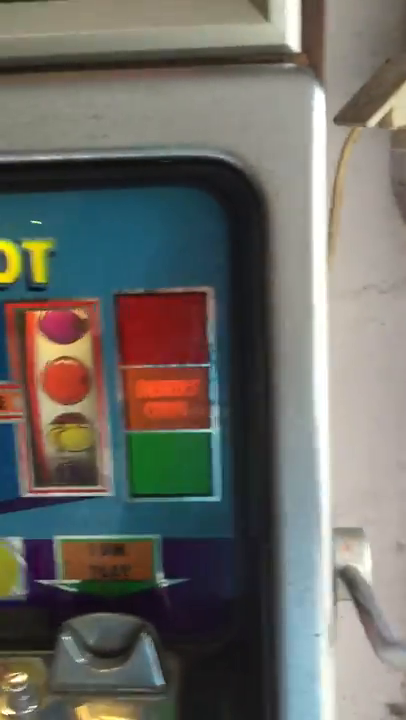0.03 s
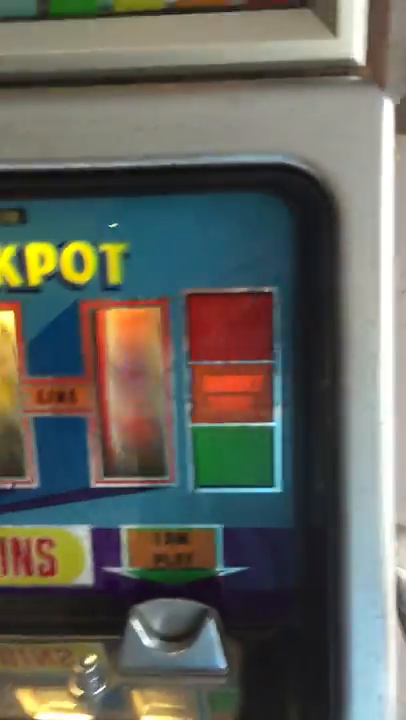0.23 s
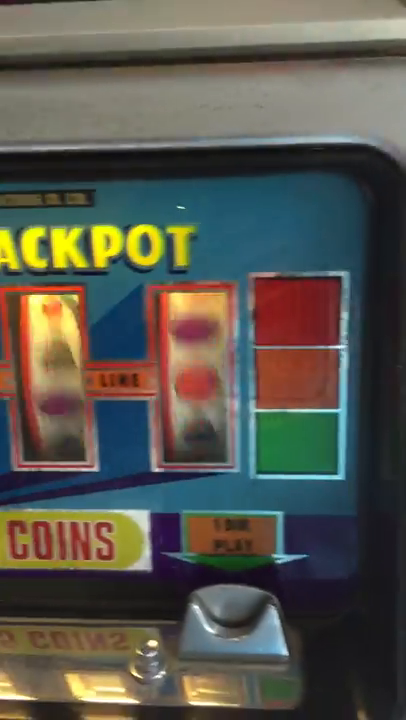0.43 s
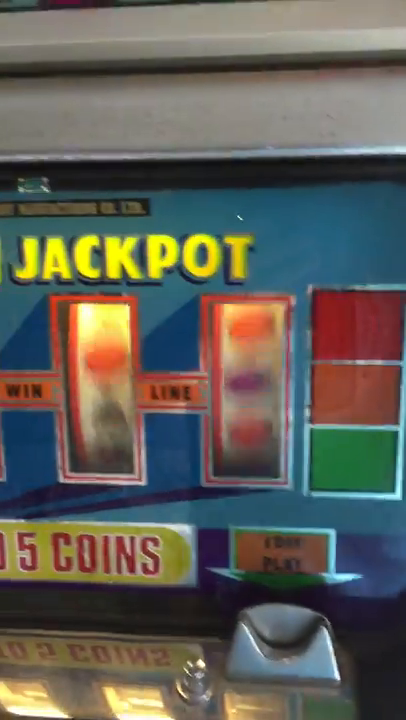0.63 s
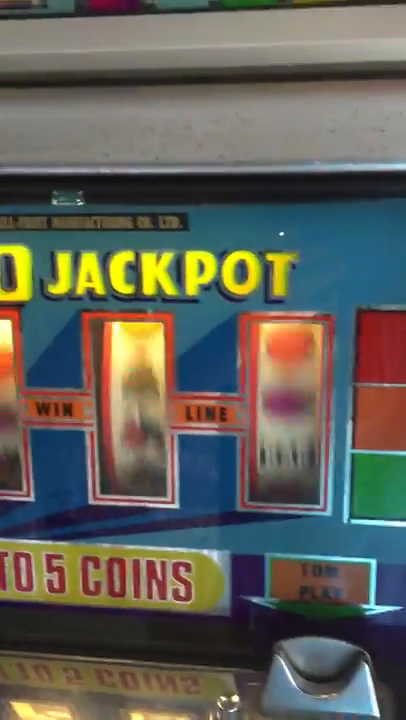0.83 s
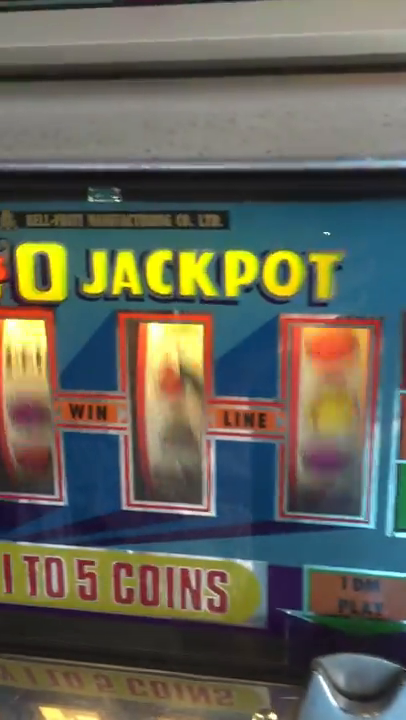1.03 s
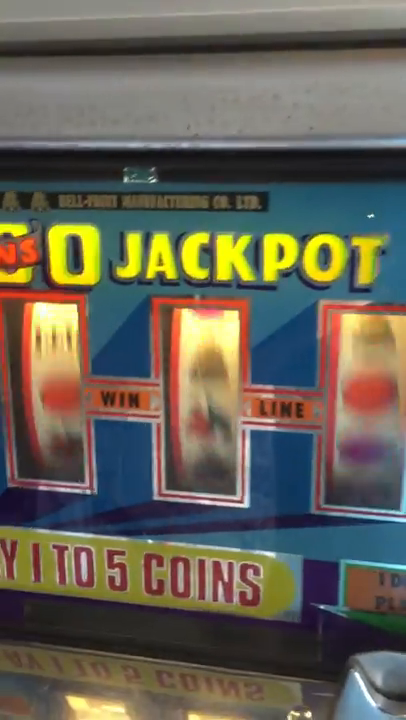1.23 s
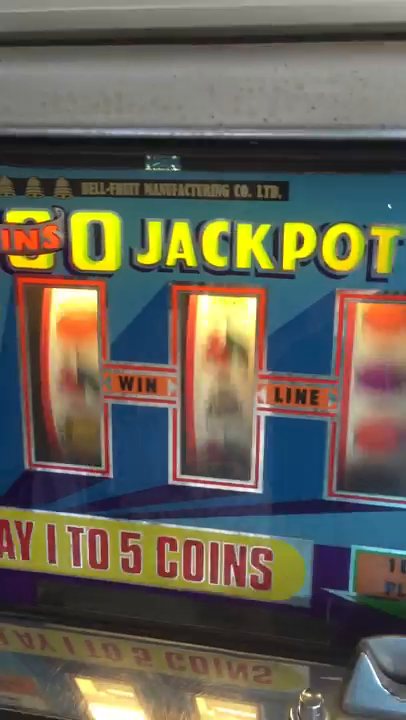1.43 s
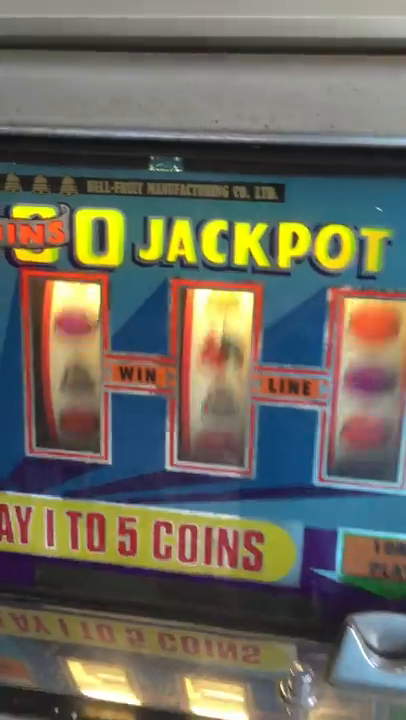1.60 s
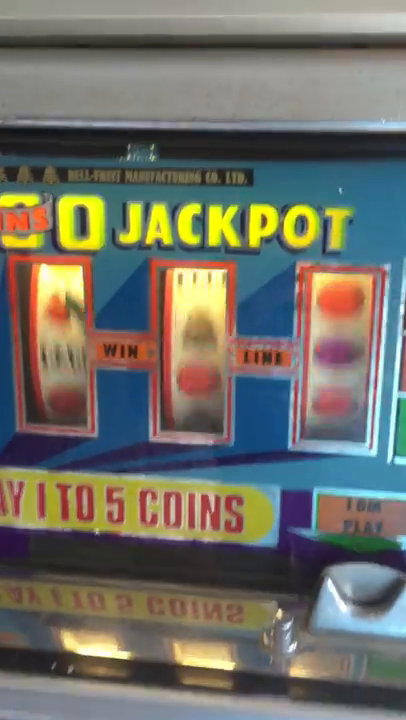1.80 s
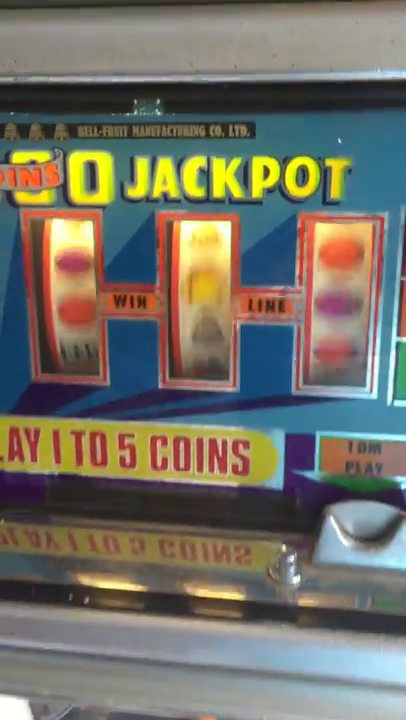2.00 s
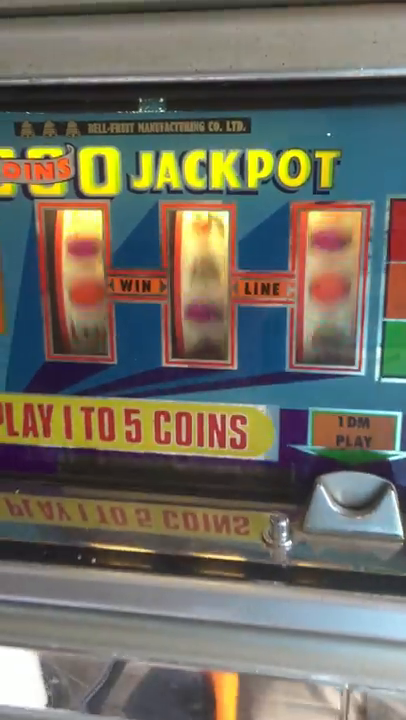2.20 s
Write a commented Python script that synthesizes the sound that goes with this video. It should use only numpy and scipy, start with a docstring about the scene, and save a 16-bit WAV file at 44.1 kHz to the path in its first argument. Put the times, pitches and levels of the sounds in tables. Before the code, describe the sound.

Heavy slot machine clunks and quick ratchet clicks, followed by softly whirring reels.

```python
"""Three heavy clunks of a mechanical slot machine, heard close, release the reels and shake the cabinet.
The lever ticks as it is drawn down ahead of them; afterwards a pawl clatters over a ratchet, slows
and stops. Each metal hit is a fast crack of coloured noise with a tail that rings in the case.
Underneath, the reels spin with a low rumble and faint scrapes while a small motor whirrs inside."""
import sys
import numpy as np
from scipy import signal
from scipy.fft import rfft, irfft
from scipy.io import wavfile

SR = 44100
rng = np.random.default_rng(int(sys.argv[2]) if len(sys.argv) > 2 else 0)


def bounce(signal):
    """Save signal as a 16-bit WAV file at the path given by the first command-line argument."""
    frames = np.transpose(np.atleast_2d(signal))
    limited = np.clip(frames, -1, 1)
    pcm = np.round(limited * 32767).astype(np.int16)
    wavfile.write(sys.argv[1], SR, pcm)


N = 103635
T = np.arange(N) / SR

# low modes of the cabinet (frequency [Hz], level [dB], t60 [s])
CABINET_MODES = [(94.7, -3.5, .35), (109.8, 1, .36), (136, -3.5, .25), (172, -2, 0.23), (195, -11, .25),
                 (223.2, -6, .28), (277, -9.5, .22), (323.2, -4, .28), (404, -9.5, 0.24)]
# tone of light metal contact (frequency [Hz], level [dB])
CONTACT_EQ = [(240, 11), (400, -2.5), (1630, -3), (2120, -3), (2400, -1), (2930, -2), (3260, -5.5),
              (3580, -6), (5350, -10.5), (5780, -7), (7060, -17.5), (9610, -19.5), (16000, -36)]


def release_clunks():
    """Spring-driven parts slam home, ringing the steel frame and thumping the cabinet."""
    # blows (time [s], level [dB], rattle [s], crack t60 [s], tail [dB], frame share [ratio], thump [dB])
    blows = [(0.2261, -14, 0.0079, 0.13, 4.5, 0.22, -12), (.298, -5.5, 0.0034, 0.04, -4, 0.34, -13),
             (0.3772, -4, 0.012, 0.052, 1.5, 0.89, -14)]
    # one tone curve for each blow (frequency [Hz], level [dB])
    blow_eqs = [
        [(150, -9), (250, 7.5), (369, -11), (615, -17.5), (1010, -12.5), (1140, -14), (2190, -10.5), (3070, -4),
         (4770, -8), (10600, -25), (14800, -22), (17000, -36)],
        [(150, -38), (250, -2.5), (637, -23), (1100, -1.5), (2350, -14), (2620, -13.5), (3350, -18.5),
         (4520, -14), (4940, -17), (7280, -23), (8240, -22), (11300, -26.5), (17000, -37)],
        [(150, 2.5), (400, -6.5), (700, -13.5), (1100, -3.5), (2000, -7), (3500, -4.5), (5000, -12), (6300, -8),
         (8000, -16), (13000, -16.5), (17000, -26)],
    ]
    # frame resonances at full share (frequency [Hz], width [Hz], boost [dB])
    frame = [(637, 110, 11), (852, 160, 8), (1036, 70, 10), (1466, 40, 7), (1708, 160, 6), (1939, 160, 13),
             (2112, 80, 12), (2266, 90, 13), (2772, 160, 8), (3108, 100, 7), (3442, 60, 9), (3605, 120, 14),
             (4469, 90, 14), (7408, 50, 10), (12067, 120, 11)]
    # tone of the tail (frequency [Hz], level [dB])
    tail_eq = [(200, -7.5), (600, -3.5), (1300, -9.5), (2500, -8), (5000, -8.5), (10000, -1.5),
               (16000, -12)]
    frame_in_tail = .45
    out = np.zeros(N)
    for (s, db, rattle, t60, wet_db, share, thump_db), eq in zip(blows, blow_eqs):
        crack_peaks = [(f, width, share * boost) for f, width, boost in frame]
        tail_peaks = [(f, width, frame_in_tail * boost) for f, width, boost in crack_peaks]
        metal = colour(rng.standard_normal(SR // 2), eq, peaks=crack_peaks)
        case = colour(rng.standard_normal(SR // 2), eq, peaks=tail_peaks)
        add(out, s, amp(db) * strike(metal, rattle, t60, tail_eq, bloom=0.65, wet_db=wet_db, case=case))
        add(out, s, amp(thump_db) * ring(CABINET_MODES, rise=0.016))
    return out


def ratchet():
    """The same pawl drops off each tooth, never in quite the same way."""
    # pawl hits (time [s], level [dB], clack boost [dB], ring boost [dB], sizzle boost [dB])
    teeth = [(.7175, -10, -0.83, -5, 3), (.756, -8.5, -0.97, -2.5, 0), (0.793, -10.5, 0.65, 3.5, 1.5),
             (.828, -11.5, 1, -2, 4), (0.8631, -11, 0.59, 1, 1.5), (0.9007, -11, 1, -3, -2.5),
             (.940, -12.5, 1, 0.5, 2.5), (0.986, -12, -1.5, 2.5, 2), (1.0393, -11.5, -1.4, -0.5, 0.5),
             (1.097, -12.5, -0.27, 0, -0.5), (1.1631, -17.5, 0.37, -7.5, -12)]
    # anchors of each hit's tone: flat, clack, flat, ring, sizzle (frequency [Hz])
    bands_hz = [600, 1800, 3200, 5500, 11000]
    # tone of the pawl (frequency [Hz], level [dB])
    pawl_eq = [(200, -4), (500, 0.5), (900, -2.5), (1500, -3), (2500, 0), (4000, -4.5), (6000, -5),
               (8000, -3), (11000, -3.5), (14000, -6.5), (17500, -15)]
    # resonances of pawl and wheel (frequency [Hz], width [Hz], boost [dB])
    resonances = [(1319, 380, 11), (2010, 350, 14), (2500, 250, 3), (2999, 200, 9), (3449, 400, 6),
                  (4496, 220, 12), (4758, 130, 10), (5187, 170, 13), (5655, 280, 14), (6156, 250, 11),
                  (6711, 230, 9), (9057, 120, 7), (9700, 180, 5), (11164, 90, 8), (11649, 340, 8),
                  (14103, 150, 6), (15480, 400, 8)]
    # ring of the case (frequency [Hz], level [dB])
    case_eq = [(150, -16), (250, -3), (389, -3), (649, -5.5), (940, -0.5), (1620, -1.5), (1940, 0.5),
               (2480, 1), (3120, -5), (3410, -0.5), (4000, -5.5), (5210, -7), (7680, -8), (11500, -9),
               (12800, -11.5), (15600, -17), (17000, -25)]
    # tone of the tail (frequency [Hz], level [dB])
    tail_eq = [(200, -7), (600, -9), (1300, -8.5), (2500, -10), (5000, -8.5), (10000, -8), (16000, -9.5)]
    likeness, vary_db, thump_db = .25, 1.8, -40
    out = np.zeros(N)
    common = rng.standard_normal(SR // 2)
    hz = np.fft.rfftfreq(len(common), 1 / SR)
    for s, db, clack_db, ring_db, sizzle_db in teeth:
        blow = np.sqrt(likeness) * common + np.sqrt(1 - likeness) * rng.standard_normal(len(common))
        boost_db = curve_at(list(zip(bands_hz, [0, clack_db, 0, ring_db, sizzle_db])), hz)
        peaks = [(f, width, boost + vary_db * rng.standard_normal()) for f, width, boost in resonances]
        metal = colour(irfft(rfft(blow) * amp(boost_db)), pawl_eq, peaks=peaks)
        case = colour(rng.standard_normal(len(common)), case_eq)
        add(out, s, amp(db) * strike(metal, hold=0.0043, t60=0.05, tail_eq=tail_eq, case=case))
        add(out, s, amp(thump_db) * ring(CABINET_MODES[-4:], rise=0.01))  # upper modes only
    return out


def lever():
    """The lever's linkage slides and gives light, pinging ticks."""
    # ticks (time [s], level [dB], brightness [dB/octave], ping boost [dB])
    ticks = [(.005, -34.5, 5.5, 8), (0.0381, -26.5, 1.5, 15), (0.055, -35.5, 7, -4), (0.0957, -27, 2, 4),
             (0.112, -34.5, 4, -2), (0.161, -29.5, 1.5, 19), (0.178, -35, 3.5, 3), (0.1953, -28.5, 5.5, -6),
             (0.201, -24, 5, 0), (0.211, -25.5, -2.5, -1), (.3165, -24.5, 2, -2),
             (0.5906, -33.5, 4.5, 10.5), (.683, -34.5, 1, 11), (0.708, -29.5, 5.5, -3), (1.829, -45, 6, -9),
             (1.841, -40, 7, 0)]
    # envelope of the slide (time [s], level [dB])
    slide_levels = [(0, -36.5), (.1, -51.5), (.19, -44), (.26, -24), (.36, -25.5), (.45, -42), (.6, -64),
                    (.7, -58)]
    # tone of a tick's tail (frequency [Hz], level [dB])
    tail_eq = [(200, 2), (1300, -7.5), (5000, -9.5), (16000, -20)]
    ping_hz, ping_width_hz = 2100, 180
    slide = colour(rng.standard_normal(N), CONTACT_EQ, tilt_db=-4.0)
    out = slide * amp(np.interp(T, *np.transpose(slide_levels), right=-90))
    for s, db, tilt, ping_db in ticks:
        metal = colour(rng.standard_normal(SR // 2), CONTACT_EQ, tilt, [(ping_hz, ping_width_hz, ping_db)])
        add(out, s, amp(db) * strike(metal, hold=0.00067, t60=0.067, tail_eq=tail_eq, bloom=0.55))
    return out


def reels():
    """The turning works rumble through the cabinet, with a wavering hum."""
    # tone of the rumble (frequency [Hz], level [dB])
    rumble_eq = [(21, -60), (35, -31), (55, -11.5), (129, -4), (173, -17), (197, -17), (222, -24.5),
                 (303, -17), (336, -24.5), (368, -19), (509, -37.5), (684, -34.5), (1200, -38), (1560, -68),
                 (2640, -120)]
    # hum partials (frequency [Hz], relative level [dB])
    partials = [(73, -6), (99.5, -11.5), (124, -2.5), (148, -7), (197, -14), (313, -19), (376, -20.5),
                (447, -26)]
    # envelope of rumble and hum (time [s], level [dB])
    levels = [(0, -35), (.18, -36.5), (.5, -37.5), (.7, -35.5), (.83, -45), (1, -40), (1.09, -47.5),
              (1.24, -34), (1.37, -41.5), (1.54, -44), (1.65, -40), (1.78, -44), (1.89, -37), (2.15, -42.5),
              (2.33, -40.5)]
    rumble = colour(rng.standard_normal(N), rumble_eq)
    hum = sum(amp(db + 1.3 * drift(2.1)) * np.sin(2 * np.pi * f * T + 0.62 * drift(6.9))
              for f, db in partials)
    return amp(np.interp(T, *np.transpose(levels))) * (amp(-4) * rumble + amp(-1) * hum)


def motor():
    """A fine whirr that swells once in each turn of the shaft, with loose gears chattering in it."""
    # tone of the whirr (frequency [Hz], level [dB])
    whirr_eq = [(350, -57), (600, -11), (720, -10.5), (952, -9.5), (1040, -17), (1240, -13), (1410, -16),
                (1860, -12), (2140, -15), (2500, -9.5), (3550, -19.5), (5710, -7), (6660, -12),
                (9060, -5.5), (10700, -18), (13400, -8.5), (17000, -28)]
    # envelope of the whirr before its swell (time [s], level [dB])
    levels = [(0, -60), (1.3, -54), (1.45, -54), (1.65, -55.5), (1.9, -54), (2.35, -55)]
    # resonances of motor and gears (frequency [Hz], width [Hz], boost [dB])
    gears = [(700, 30, 7), (850, 40, 8), (970, 70, 6), (1680, 60, 4), (2740, 280, 6), (3230, 50, 7),
             (5680, 400, 3), (9460, 60, 4)]
    # pings of loose gear teeth (frequency [Hz], relative level [dB], t60 [s])
    tooth_modes = [(2620, -6, .04), (2740, -3, .04), (2860, -6, .04), (5350, -6, .02), (5650, -2, .02),
                   (5950, -5, .015), (8500, -3, .008)]
    # thin tones of the motor (frequency [Hz], level [dB])
    tones = [(2444, -60.5), (2708, -67), (2800, -77)]
    shaft_hz, rub_peak_s, rub_db, rub_sharpness = 24.97, 1.317, 6, 1.4
    taps_per_s, chatter_db = 60, -61
    whirr = amp(np.interp(T, *np.transpose(levels))) * colour(rng.standard_normal(N), whirr_eq, peaks=gears)
    chatter = 0
    for f, db, t60 in tooth_modes:
        taps = (rng.random(N) < taps_per_s / SR) * rng.standard_normal(N)
        chatter += amp(db) * signal.oaconvolve(taps, ring([(f, db, t60)], rise=.001))[:N]
    rub = (.5 + .5 * np.cos(2 * np.pi * shaft_hz * (T - rub_peak_s))) ** rub_sharpness
    swell = amp(rub_db * rub + .8 * drift(120) + .6 * drift(15))
    whine = sum(amp(db + 2 * drift(25)) * np.sin(2 * np.pi * f * T + drift(7.6)) for f, db in tones)
    return whine + swell * (whirr + amp(chatter_db) * unit(chatter))


def reel_scrapes():
    """Now and then a reel brushes its frame."""
    # faint scrapes (time [s], length [s], level [dB], pitch [Hz])
    scrapes = [(1.496, 0.054, -57, 1570), (1.825, 0.1, -52.5, 2665), (2.156, 0.048, -57, 1620)]
    out = np.zeros(N)
    for s, length, db, hz in scrapes:
        rub = colour(rng.standard_normal(SR // 4), CONTACT_EQ, tilt_db=-1, peaks=[(hz, 600, 12)])
        swell = np.hanning(int(length * SR))
        add(out, s, amp(db) * swell * rub[:len(swell)])
    return out


def strike(metal, hold, t60, tail_eq, bloom=1, wet_db=0, case=None):
    """Dense metal modes: the treble speaks first, the crack dies fast, the case rings on."""
    # attack, scaled by bloom (frequency [Hz], rise [s])
    rises = [(200, 0.015), (1000, 0.0083), (2000, 0.0037), (4000, 0.001), (9000, 0.00021), (16000, .0005)]
    # decay inside the case (frequency [Hz], t60 [s])
    case_t60 = [(150, 0.46), (600, 0.34), (2000, 0.27), (5000, 0.29), (10000, 0.17), (16000, 0.3)]
    t, hz = T[:len(metal)], np.fft.rfftfreq(len(metal), 1 / SR)
    bands_hz = np.geomspace(200, 15000, 10)
    spectra = rfft(np.array([metal, metal if case is None else case]))
    out = 0
    for f, solo in zip(bands_hz, np.eye(len(bands_hz))):
        metal_band, case_band = irfft(spectra * np.interp(hz, bands_hz, solo), len(t))
        haste = max(f / 3000, 1) ** 0.1  # higher modes die sooner
        attack = np.minimum(t / (bloom * curve_at(rises, f)), 1)
        crack = amp(-60 * np.maximum(t * haste - hold, 0) / t60) * np.sqrt(haste)
        tail = amp(wet_db + curve_at(tail_eq, f) - 60 * t / curve_at(case_t60, f))
        out += attack * (metal_band * crack + case_band * (np.hypot(crack, tail) - crack))
    return out


def ring(modes, rise):
    """Decaying modes that swell over the length of the blow."""
    t = T[:SR]
    out = sum(amp(db - 60 * t / t60) * np.sin(2 * np.pi * (f * t + rng.random())) for f, db, t60 in modes)
    return out * np.minimum(t / rise, 1) / np.linalg.norm([amp(db) for _, db, _ in modes])


def colour(x, eq, tilt_db=0, peaks=()):
    """Shapes noise with an EQ curve, a tilt per octave and resonances; cuts the lows below the curve."""
    hz = np.fft.rfftfreq(len(x), 1 / SR) + 1
    lowest_hz = eq[0][0]
    db = curve_at(eq, hz) + tilt_db * np.log2(np.maximum(hz, lowest_hz))
    for f, width, boost in peaks:
        db += boost / (1 + (2 * (hz - f) / width) ** 2)
    low_cut = np.minimum(hz / lowest_hz, 1) ** 3.5
    return unit(irfft(rfft(x) * amp(db) * low_cut, len(x)))


def drift(hz):
    """Smooth random wander of rms 1."""
    f = np.fft.rfftfreq(N, 1 / SR)
    return unit(irfft(rfft(rng.standard_normal(N)) * np.exp(-(f / hz) ** 2), N))


def curve_at(points, hz):
    """Reads a curve on a log-frequency axis."""
    f, value = np.transpose(points)
    return np.interp(np.log(hz + 1), np.log(f + 1), value)


def amp(db):
    """Decibels to gain."""
    return 10 ** (np.asarray(db) / 20)


def unit(x):
    """Scales to rms 1."""
    return x / np.sqrt(np.mean(x ** 2) + 1e-20)


def add(mix, s, sound):
    """Lays a sound into the mix at s seconds."""
    part = mix[max(round(s * SR), 0):][:len(sound)]
    part += sound[:len(part)]


def scene():
    """All parts of the machine, mixed in mono."""
    return (lever() + release_clunks() + ratchet() + reels() + reel_scrapes() + motor())[None]


def record(dry):
    """The loudest blow overloads the microphone; a steep low-pass trims the very top."""
    soft_clipped = dry / (1 + dry ** 8) ** (1 / 8)
    low_pass = signal.firwin(511, cutoff=17900, window=("kaiser", 9), fs=SR)
    return signal.oaconvolve(soft_clipped, low_pass[None], "same")


dry = scene()
out = record(dry)
bounce(out)
```